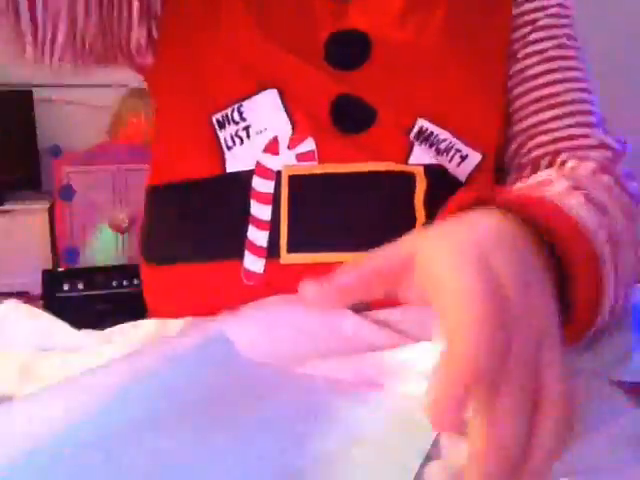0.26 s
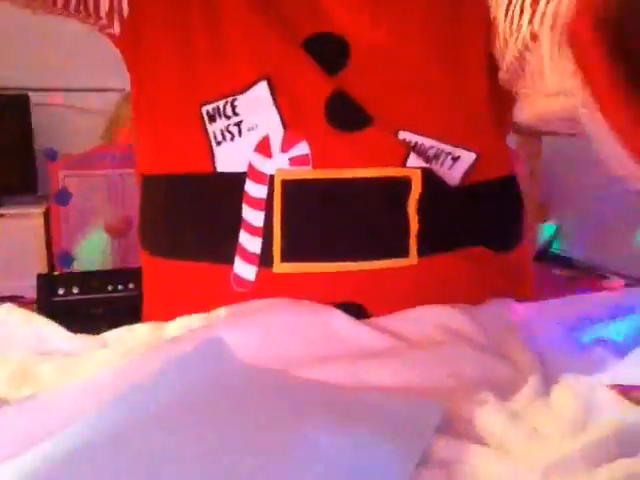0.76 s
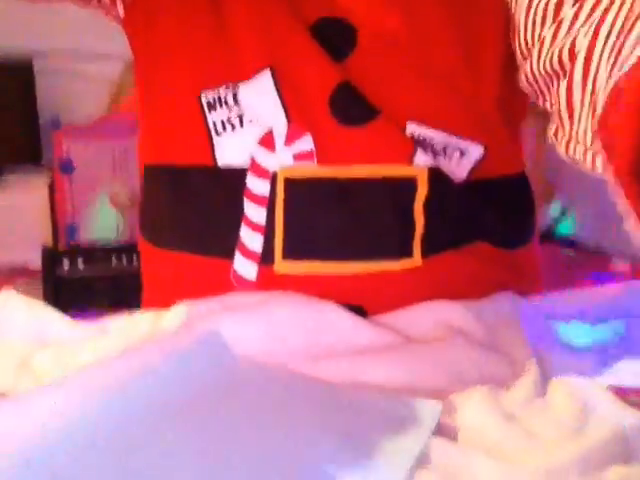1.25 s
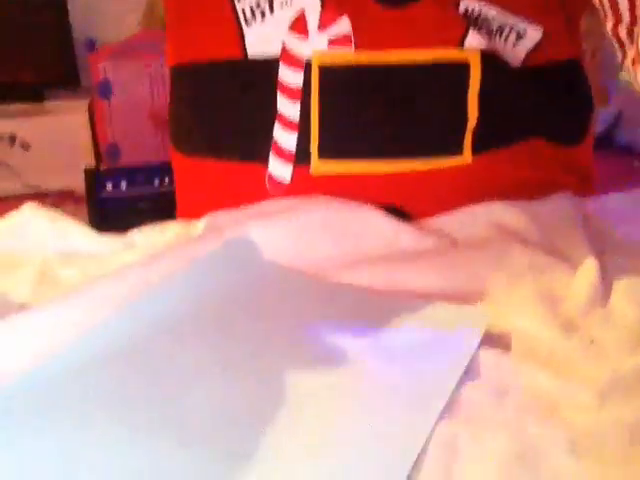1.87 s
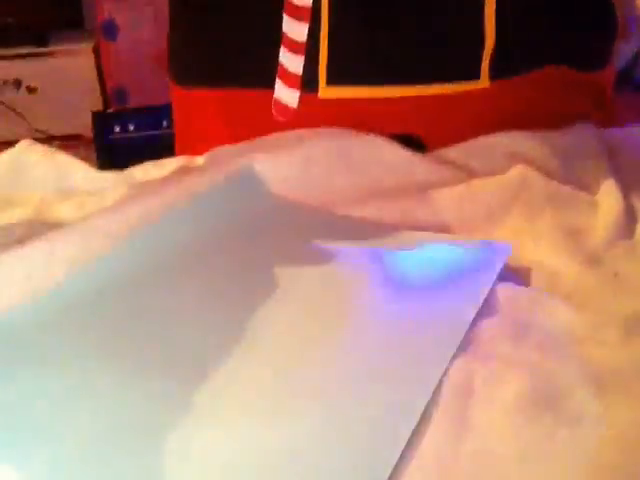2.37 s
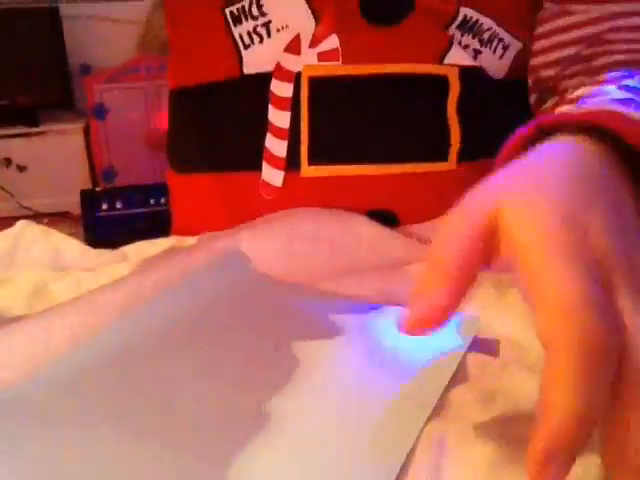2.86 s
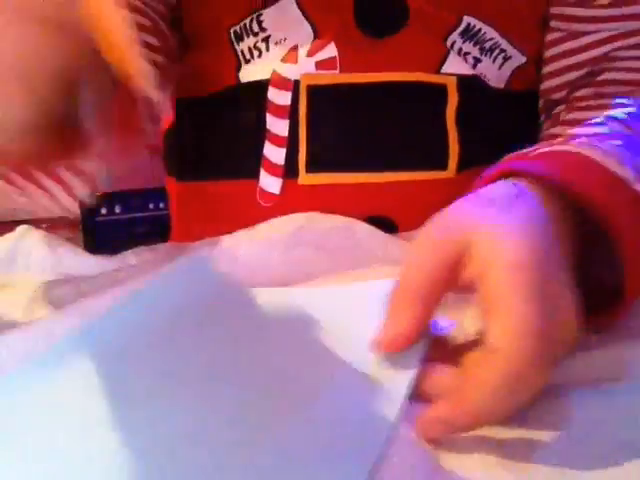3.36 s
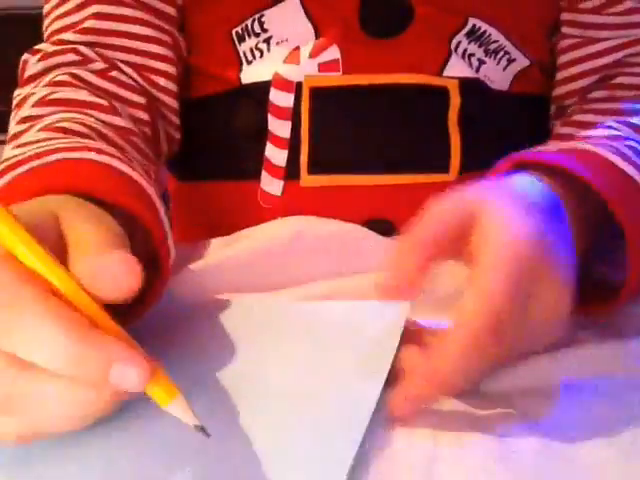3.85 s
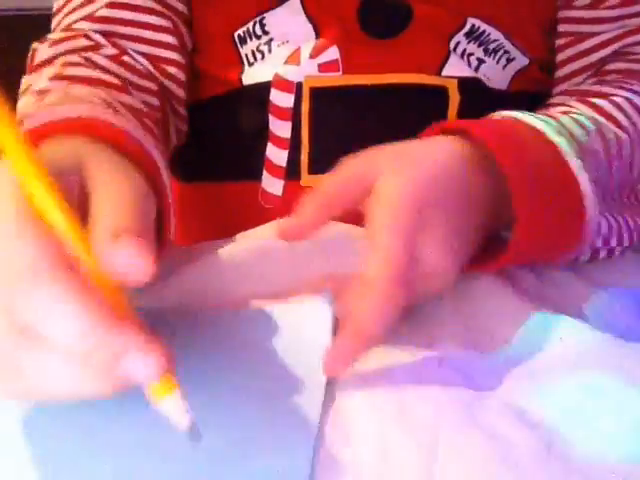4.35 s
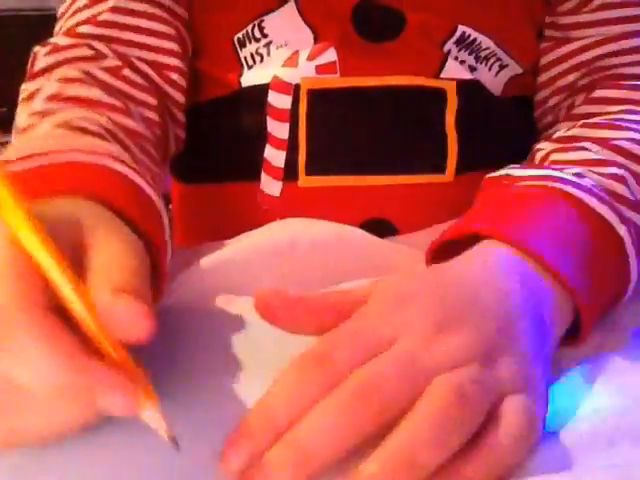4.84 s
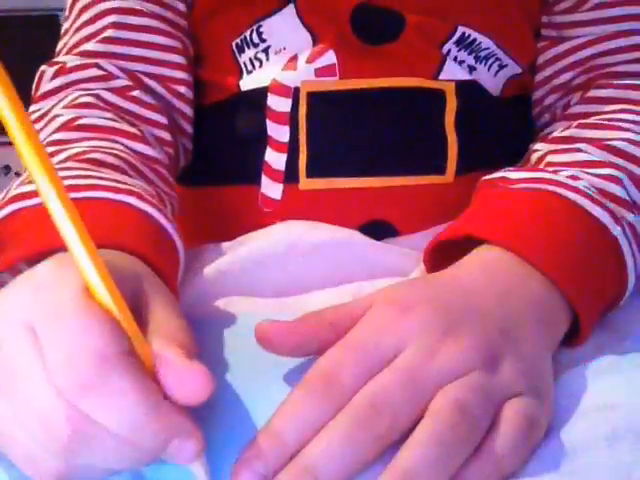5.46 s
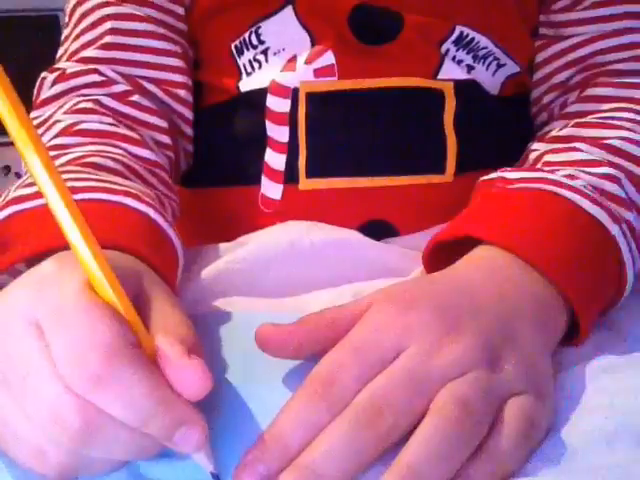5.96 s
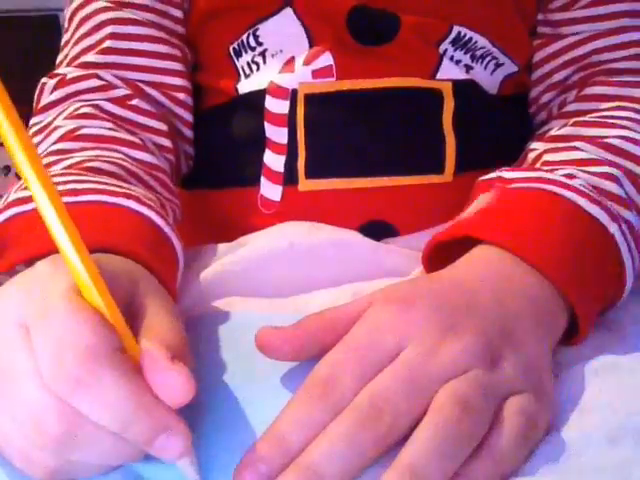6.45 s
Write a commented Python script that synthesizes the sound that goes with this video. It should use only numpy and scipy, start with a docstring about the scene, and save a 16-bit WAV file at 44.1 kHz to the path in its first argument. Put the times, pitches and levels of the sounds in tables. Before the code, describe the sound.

Hands grab a small plastic camera and tilt it, making sharp cracks, dull thuds and rubbing right at the microphone. Its stiff hinge creaks in a run of little slips, and another loud knock follows. Then it gets much quieter: hands slide over paper with a soft hiss, and a pencil scratches in short strokes with tiny clicks. A quiet room and faint microphone hiss lie underneath.

```python
"""A small camera's plastic shell cracks, thuds and creaks as hands tilt it on its stiff hinge.
Tiny sharp bursts make the thin plastic ring, soft pushes and finger taps thud through its body, and
the hinge creaks in a run of little slips. Then the hands slide over paper with a hiss, and a pencil
scratches on it in short strokes. Behind it all are a quiet room and a hissy microphone."""
import sys
import numpy as np
from scipy import signal
from scipy.fft import rfft, irfft
from scipy.io import wavfile
from scipy.ndimage import uniform_filter1d

SR = 44100
rng = np.random.default_rng(int(sys.argv[2]) if len(sys.argv) > 2 else 0)


def wrap_up_sound(samples):
    """Save the sound to the file named by the first command line argument, as 16-bit audio."""
    columns = np.atleast_2d(samples).T
    # keep every value between -1 and 1, then stretch to whole-number steps
    tamed = np.clip(columns, -1, 1)
    steps = np.round(tamed * 32767).astype(np.int16)
    wavfile.write(sys.argv[1], SR, steps)


N = 295470
SIZE, LEAD = 4096, 512  # samples in one crack or thud, and in its run-up
HZ = np.fft.rfftfreq(SIZE, 1 / SR) + 1e-3
HOP, FRAMES = 64, N // 64 + 5  # noise is built in short frames, HOP samples apart

# Notes at which the thin shell rings: f/Hz, level/dB, time to fade by 60 dB/s
SHELL_NOTES = [(1130, -14.5, 0.01), (2140, -8.5, 0.016), (2680, -3, 0.015), (3470, -10, 0.002),
               (4610, -2.5, 0.007), (6770, 1.5, 0.0013), (8710, -1, .005), (15100, -14, 0.0027)]


def gain_of(db):
    """Turn decibels into a factor to multiply by; gain_of(2 * db) gives power."""
    return 10 ** (np.asarray(db) / 20)


def level_at(points, hz):
    """Read a tone curve's level in dB at any frequency, joining its points on a pitch scale."""
    f, db = np.transpose(points)
    return np.interp(np.log(hz + 1), np.log(f), db)


def ring(notes, scatter_db, count):
    """Spectra of fading notes; each hit lands somewhere new and so mixes them differently."""
    hz, db, fade_s = np.transpose(notes)
    weight = gain_of(db + scatter_db * rng.standard_normal((count, len(notes))))
    damping = (np.log(1000) / fade_s / (2 * np.pi))[:, None]
    hz = hz[:, None]
    return weight @ (hz * damping / (hz ** 2 - HZ ** 2 + 2j * HZ * damping))


def place(seconds, peak_db, spectra):
    """Turn each spectrum into a short sound that peaks at the given time and level."""
    shapes = irfft(spectra * np.exp(-2j * np.pi * HZ * LEAD / SR), SIZE)
    shapes *= (gain_of(peak_db) / abs(shapes).max(1))[:, None] * signal.windows.tukey(SIZE, .1)
    out = np.zeros(N + SIZE)
    for s, shape in zip(seconds, shapes):
        out[round(s * SR) - abs(shape).argmax():][:SIZE] += shape
    return out[:N]


def noise(tone, level_db, patchy_db, flicker_db, drift_db=0):
    """Noise shaped by a tone curve; patches of it swell and fade while the whole of it flickers."""
    real, imag, patches = rng.standard_normal((FRAMES, 2 * HOP + 1, 3)).T
    patches = uniform_filter1d(uniform_filter1d(patches, size=5, axis=0), size=18, axis=1)
    flicker = uniform_filter1d(rng.standard_normal(FRAMES), size=4)
    colour = gain_of(level_at(tone, np.fft.rfftfreq(4 * HOP, 1 / SR))[:, None] + drift_db)
    strength = ((colour ** 2).mean(0) / gain_of(2 * drift_db).mean()) ** .5
    wobble_db = drift_db + patchy_db * patches / patches.std() + flicker_db * flicker / flicker.std()
    spectra = (real + 1j * imag) * gain_of(wobble_db) / strength  # keeps the level as the tone drifts
    raw = signal.istft(spectra, nperseg=4 * HOP, noverlap=3 * HOP)[1][:N]
    shaped = irfft(rfft(raw) * gain_of(level_at(tone, np.fft.rfftfreq(N, 1 / SR))), N)
    return shaped / shaped.std() * gain_of(level_db)


def room_hush():
    """The low, steady hush of the room and the microphone's own hiss."""
    # Tone of the background: f/Hz, level/dB
    hush_tone = [(12, -50), (20, -34), (48, -17.5), (123, -5), (216, -0.5), (718, -10.5), (3250, -15),
                 (4420, -17), (14700, -24), (16000, -27.5)]
    return noise(hush_tone, level_db=-66, patchy_db=.6, flicker_db=.3)


def touch():
    """How strongly the hands rub in each frame: swipes swell, hold and fade over a faint contact."""
    # Swipes of skin and cloth: start of hold/s, hold/s, rise by 20 dB/s, fall by 20 dB/s,
    # hiss/dB, hiss centre/octaves above 1 kHz, hiss spread/octaves, rumble/dB
    swipes = [(0.115, 0.062, 0.16, 0.84, -61.5, 2, 1.1, -72), (0.486, 0.024, .05, 0.057, -49, 0, 1, -65),
              (.5, 0.18, .08, .08, -56, 2.5, 1.11, -81), (.58, 0.089, 0.042, 0.068, -45.5, .3, 0.65, -55.5),
              (0.761, .055, 0.018, .04, -30.5, 1.82, 0.56, -26),
              (0.729, .03, 0.012, .02, -40.5, 1, .8, -30), (.88, 0.033, .05, .1, -59, 1, 1, -49.5),
              (1.006, 0.039, 0.022, .03, -48.5, 0.9, .8, -46),
              (1.09, 0.013, 0.021, .05, -50.5, 1.6, 1.22, -51),
              (1.232, 0.041, 0.13, .3, -57, 0.76, 0.64, -53), (1.622, 0.061, .04, .06, -56.5, 1.5, .3, -52),
              (1.702, 0.022, .06, .1, -50, 1.36, .65, -42.5),
              (1.761, 0.022, 0.06, 0.027, -38.5, 2, 0.55, -44.5),
              (1.915, .025, .02, .04, -46.5, 1, .8, -43), (1.949, 0.064, 0.018, .05, -60, 1, .8, -52),
              (2.179, .015, .04, .04, -54, .5, .7, -55), (2.102, 0.25, 0.044, .05, -60, 1.1, 0.45, -55),
              (2.406, 0.045, 0.063, .03, -51.5, 1.8, 0.69, -60),
              (2.451, .012, .04, .025, -45.5, 1.46, 1.2, -43),
              (2.515, 0.0053, 0.043, .045, -45.5, .4, 1, -34), (2.746, 0.013, .04, .12, -62, .5, 1.1, -58),
              (2.78, 0.21, .05, .4, -66, 2.5, 0.59, -60), (2.952, 0.018, 0.14, .12, -56.5, 1.5, 1.7, -70),
              (3.058, .14, .06, .1, -63.5, -0.8, 0.36, -63), (3.342, .12, 0.14, .12, -57, 2, 0.94, -72),
              (3.601, 0.028, .12, 0.11, -58, 1.27, 1.37, -63), (3.734, .11, .15, .07, -57.5, 2, .85, -69.5),
              (4.03, 0.23, 0.083, 0.22, -51.5, 2, .8, -65.5),
              (4.338, 0.031, 0.11, .14, -47, 1.78, 0.95, -56),
              (4.796, .25, 0.37, .15, -64.5, 2, 0.93, -70.5), (4.85, 0.019, .06, .12, -60, 0.66, 0.86, -63),
              (4.86, .03, .03, .08, -55.5, -0.97, .25, -67), (5.298, 0.026, 0.18, .2, -63.5, 1.6, 1.3, -62),
              (5.497, 0.28, .2, 0.13, -65.5, 1.3, 1.33, -66), (6.203, 0.13, 0.18, .3, -68, 1.5, 1.2, -65.5),
              (6.481, 0.24, .15, .3, -61.5, 1.6, 0.95, -65.5)]
    rest_held, rest_free = (-67.5, .8, 0.6, -62.5), (-73, 2.3, 4, -81)  # like the last four columns
    grab_s, let_go_s = .42, 2.62
    t = np.arange(FRAMES) * HOP / SR
    held = (t > grab_s) & (t < let_go_s)
    start, hold, rise, fall = np.transpose(swipes)[:4, :, None]
    swell_db = -20 * np.maximum(np.maximum((start - t) / rise, (t - start - hold) / fall), 0)
    power = np.r_[gain_of(2 * swell_db), [held, ~held]]
    settings = np.r_[np.array(swipes)[:, 4:], [rest_held, rest_free]]
    return t, held, power, settings.T


def rubbing():
    """Skin slides over fine grain: a hiss whose tone follows each swipe, and a rumble in the shell."""
    # Tone of rubbing carried by the plastic while it is held: f/Hz, level/dB
    through_shell = [(800, 0), (1200, 2), (1800, -1), (3100, 0), (4600, -0.5), (6500, -3.5), (10000, 0),
                     (16000, -14.5)]
    # Tone the microphone's opening gives to rubbing heard through the air: f/Hz, level/dB
    through_air = [(800, -3), (1500, -0.5), (2300, -0.5), (2900, -3), (3300, -8.5), (4400, 3.5), (5400, -5),
                   (6500, 2), (7500, -4), (8700, 1), (10500, -4), (14000, -3), (16000, -4.5)]
    # Tone of the shell's lumpy rumble: f/Hz, level/dB
    rumble_tone = [(40, -46.5), (130, -1), (250, 2.5), (480, -0.5), (750, -11.5), (1300, -48)]
    frame_s, held, power, (hiss_db, centre, spread, rumble_db) = touch()
    t, hz = np.arange(N) / SR, np.fft.rfftfreq(4 * HOP, 1 / SR)
    octave = np.log2(hz / 1000 + .05)[:, None]
    offset = (octave - centre) / np.clip(spread, .2, 3)
    band_db = -9 * np.log2(1 + .4 * offset ** 2) - 2.3 * octave - 0.54 * np.maximum(offset, 0) ** 2
    band, hiss_power = gain_of(2 * band_db), gain_of(2 * hiss_db)
    # Where swipes overlap, the louder one has more say in the tone.
    drift_db = 10 * np.log10((band / band.mean(0) * hiss_power) @ power / (hiss_power @ power))
    drift_db += np.where(held, level_at(through_shell, hz)[:, None], level_at(through_air, hz)[:, None])
    hiss_level = np.interp(t, frame_s, 10 * np.log10(hiss_power @ power))
    rumble_level = np.interp(t, frame_s, 10 * np.log10(gain_of(2 * rumble_db) @ power))
    hiss = noise([(300, -14.5), (800, 0)], hiss_level, patchy_db=1.7, flicker_db=0.94, drift_db=drift_db)
    return hiss + noise(rumble_tone, rumble_level, patchy_db=2.5, flicker_db=3.4)


def scattered(count, typical_db, scatter_db=4.5):
    """Random times, levels and brightness (-1 to 1), more often where the grip rubs harder."""
    t, held, power, (hiss_db, *_) = touch()
    share = np.cumsum(held * (gain_of(2 * hiss_db) @ power) ** 0.18)
    when, size, brightness = rng.random((count, 3)).T
    peak_db = typical_db - scatter_db * (1 + np.log(size + .02))
    return np.interp(when, share / share[-1], t), peak_db, 2 * brightness - 1


def cracks(events, notes, burst_s, direct, top_db_per_octave):
    """A burst of tiny breaks, about a millisecond long, makes thin plastic ring."""
    s, peak_db, treble_db = np.transpose(events)
    t = np.arange(SIZE) / SR
    burst = rng.standard_normal((len(s), SIZE)) * np.exp(-t / burst_s)
    burst[:, 0] += 2.2  # a sharp first click
    tilt_db = treble_db[:, None] * np.clip(np.log2(HZ / 3000) / 1.5, -.3, 1.2)
    tilt_db += top_db_per_octave * np.maximum(np.log2(HZ / 9000), 0)
    bass_cut = 1 / (1 - 1j * 1100 / HZ) ** 3
    ringing = ring(notes, scatter_db=5.7, count=len(s))
    return place(s, peak_db, rfft(burst) * gain_of(tilt_db) * bass_cut * (direct + ringing))


def shell_cracks():
    """The handled shell snaps sharply, with faint random crackles in between."""
    # Snaps of the plastic: t/s, peak level/dB, treble against middle/dB
    snaps = [(0.4358, -41, -14), (0.7233, -34, -13.5), (0.7268, -24, -22), (0.7326, -23.5, -19),
             (0.7372, -11, -19.5), (0.7556, -26, -14), (0.7572, -7, -4), (0.8301, -30, -4),
             (0.8835, -34, -16), (0.8885, -34, -11), (0.9104, -23.5, -1.5), (0.9133, -19, -4),
             (0.9464, -29, -12), (0.9711, -38, -22), (0.9994, -16.5, -26), (1.0145, -2.5, 3.5),
             (1.0061, -36.5, -22), (1.0258, -18, -15), (1.0311, -2, -13.5), (1.0331, -8, -11),
             (1.0543, -32, -28), (1.0865, -44, -30), (1.0911, -26, -25), (1.1774, -38, -9),
             (1.1942, -36, -9), (1.2711, -35.5, -20), (1.4997, -30, -6.5), (1.5214, -37, -16),
             (1.5268, -21, -24.5), (1.6732, -24, -56.5), (1.6951, -16.5, -20), (1.7037, -14.5, -13.5),
             (1.7146, -20.5, -11), (1.7254, -20, -16), (1.7431, -25.5, -17), (1.76, -19, -27),
             (1.7736, -20.5, -24), (1.8521, -20.5, -28.5), (1.9228, -29, 3), (1.929, -22.5, -35),
             (1.9611, -39, 3), (2.0122, -34, -23), (2.1116, -31.5, -23.5), (2.1594, -39, -4),
             (2.1846, -27.5, -12), (2.1894, -31, -15), (2.319, -29, -29), (2.4624, -8.5, -12),
             (2.4968, -29, -29), (2.5155, -13, -18), (2.5193, -5, -15.5), (2.532, -42, -18),
             (2.5508, -38, -1), (2.6563, -37, -13), (2.6652, -44, -17), (2.8196, -42, -19),
             (2.848, -35.5, -25), (2.957, -35, -32), (3.0199, -52, -10), (3.1785, -41.5, 1.5)]
    s, db, brightness = scattered(count=24, typical_db=-45.5)
    crackles = np.c_[s, db, -12.5 + 7 * brightness]
    return cracks(np.r_[snaps, crackles], SHELL_NOTES, burst_s=0.00035, direct=0.35, top_db_per_octave=-20)


def blows(events, travel_s, hollow, softness, ring_db, scatter_db):
    """A soft push travels through the shell as a bending wave, treble first, and rings the body."""
    # Notes at which the camera's body rings: f/Hz, level/dB, time to fade by 60 dB/s
    body_notes = [(135, -21, .05), (252, -11, .06), (354, 1, 0.017), (488, -7, 0.012), (754, 8.5, 0.01)]
    s, peak_db, hz = np.transpose(events)
    ratio = HZ / hz[:, None]
    panel = 1 / (1 - ratio ** 2 + 1j * ratio / hollow)  # the struck panel's own short note
    push = ratio ** 2 * panel / (1 + (softness * ratio) ** 2) ** 2
    # The wave's speed grows with the square root of frequency.
    lag_cycles = travel_s * (2 * np.sqrt(ratio) - ratio) * hz[:, None]
    ringing = gain_of(ring_db) * ring(body_notes, scatter_db, count=len(s))
    return place(s, peak_db, -push * np.exp(-2j * np.pi * lag_cycles) * (1 - 1j * ringing))


def shell_thuds():
    """Dull knocks reach the microphone through the shell, with faint random bumps from the grip."""
    # Knocks on the shell: t/s, peak level/dB, centre f/Hz
    knocks = [(0.4375, -36, 790), (0.4888, -40, 780), (0.4985, -35, 832), (0.5113, -38, 964),
              (0.6186, -27.5, 920), (0.727, -21.5, 490), (0.7406, -3.5, 333), (0.7581, -1.5, 471),
              (0.7615, -3, 310), (0.766, -21, 304), (0.79, -6.5, 323), (0.7935, -23, 325),
              (0.7985, -8.5, 348), (0.8312, -24.5, 390), (0.9986, -15, 368), (1.003, -19.5, 328),
              (1.0078, -26, 344), (1.0154, -7.5, 403), (1.0265, -17, 468), (1.032, -7, 477.5),
              (1.056, -23, 332.5), (1.0927, -27.5, 289.5), (1.5273, -33.5, 535), (1.6458, -33, 342),
              (1.6762, -34, 549), (1.6979, -32, 355), (1.7039, -28.5, 630), (1.7277, -33, 465),
              (1.7436, -31.5, 610), (1.7875, -32, 580), (1.8524, -28.5, 657), (1.9094, -29, 550),
              (1.9156, -24, 473), (1.9266, -12, 474), (1.9337, -25, 351), (1.9417, -28, 430),
              (2.0151, -42, 690), (2.3933, -38, 350), (2.4634, -14, 477), (2.5, -36, 700),
              (2.5164, -6, 455), (2.5205, -9, 470), (2.525, -15, 286), (2.5385, -34, 240),
              (2.6018, -35.5, 426), (2.6566, -43.5, 750), (2.9454, -47, 421), (2.9577, -38, 587),
              (3.6111, -43.5, 616), (4.1165, -35.5, 1157), (4.8525, -45.5, 373), (4.858, -50, 308),
              (4.8665, -48, 423), (5.2333, -45, 526), (5.3081, -47.5, 267), (5.537, -46, 395)]
    s, db, brightness = scattered(count=16, typical_db=-43)
    thuds = np.r_[knocks, np.c_[s, db, 430 * 1.5 ** brightness]]
    return blows(thuds, travel_s=.0012, hollow=1.2, softness=0.7, ring_db=0.47, scatter_db=5)


def taps_and_hinge():
    """Fingers tap dully and the stiff hinge slips; as it creaks, a thin tick comes before each slip."""
    # Hinge slips and dull finger taps, farther away along the shell: t/s, peak level/dB, centre f/Hz
    slips_and_taps = [(0.9096, -27.5, 250), (1.1836, -31.5, 211), (1.2753, -26.5, 313), (2.0715, -34, 445),
                      (2.076, -50, 304), (2.0945, -35.5, 468.5), (2.101, -40, 523), (2.1128, -31, 470),
                      (2.1306, -34, 470), (2.1504, -29.5, 456), (2.1756, -30.5, 443), (2.189, -50, 498),
                      (2.1985, -28, 390), (2.2189, -28.5, 406), (2.2431, -28, 440), (2.2633, -31.5, 417),
                      (2.283, -32.5, 405), (2.3, -34, 428), (2.3147, -31, 375), (2.3232, -30, 700),
                      (2.341, -37, 353), (2.3661, -39.5, 410), (2.6108, -41, 560), (2.7283, -45, 390),
                      (2.7474, -30.5, 435), (2.8525, -35.5, 490), (2.8875, -30.5, 340)]
    # Notes at which the hinge rings: f/Hz, level/dB, time to fade by 60 dB/s
    hinge_notes = [(1880, 3, 0.0105), (2878, 1, 0.0026), (8950, 3, 0.0053)]
    creak_from_s, creak_to_s = 2.085, 2.38
    early_s, quieter_db, treble_db = 0.0024, 6, -12.5  # each tick
    ticks = [(s - early_s, db - quieter_db, treble_db)
             for s, db, _ in slips_and_taps if creak_from_s < s < creak_to_s]
    thin = cracks(ticks, hinge_notes, burst_s=0.00126, direct=0.103, top_db_per_octave=-26)
    dull = blows(slips_and_taps, travel_s=0.00398, hollow=1.7, softness=0.55, ring_db=0.37, scatter_db=4.1)
    return thin + dull


def paper_ticks():
    """The paper and the pencil point give off faint, short clicks."""
    # Clicks: t/s, peak level/dB, treble against middle/dB
    ticks = [(3.5824, -46, -7), (3.6104, -36.5, -17), (3.7222, -38.5, -12), (4.5954, -43, -5),
             (4.8372, -44, -20.5), (4.8639, -32.5, -25), (4.8869, -42, -18), (5.2334, -35.5, -15.5),
             (5.4981, -40, 0.5), (5.5455, -34, 11), (5.5614, -44, -2.5), (5.7352, -38.5, 0.5),
             (6.1636, -46.5, 3.5), (6.2523, -39.5, -1), (6.2675, -37, 5), (6.279, -43.5, 8),
             (6.2997, -35, 0), (6.3142, -50, -2), (6.4232, -33, 4.5), (6.4322, -42.5, 5),
             (6.4499, -36.5, 2.5), (6.5289, -38.5, -10), (6.5824, -51, 8.5), (6.6491, -32.5, 5)]
    return cracks(ticks, SHELL_NOTES, burst_s=0.00041, direct=0.43, top_db_per_octave=2.8)


def pencil():
    """Pencil lead grinds over rough paper in short swelling strokes, catching on fibres as it goes."""
    # Pencil strokes: middle t/s, length/s, level/dB
    strokes = [(4.856, 0.02, -67), (4.952, 0.091, -60.5), (5.454, 0.02, -57.5), (5.492, 0.05, -55.5),
               (5.56, 0.03, -55), (5.598, 0.035, -53), (5.629, 0.051, -56.5), (5.666, 0.031, -55.5),
               (5.699, 0.032, -57), (5.734, 0.012, -54), (5.803, 0.072, -62.5), (6.172, 0.074, -60.5),
               (6.268, 0.028, -50), (6.317, 0.008, -57), (6.355, 0.053, -57), (6.428, 0.019, -57),
               (6.508, 0.03, -54), (6.539, 0.035, -54.5), (6.58, 0.036, -57.5)]
    # Tone of the grinding lead: f/Hz, level/dB
    lead_tone = [(300, -8.5), (1000, -2), (2000, 2), (3300, -6.5), (4500, -3.5), (7000, -12), (9500, -17),
                 (13500, -13)]
    catches_per_s = 1400
    t = np.arange(N) / SR
    pressure = sum(gain_of(db) * np.cos(np.pi * np.clip((t - s) / (0.99 * length), -.5, .5))
                   for s, length, db in strokes)
    catches = rng.exponential(1, N) ** 3 * (rng.random(N) < catches_per_s / SR)
    grit = 1 + 0.19 * uniform_filter1d(catches, size=40)
    return pressure * grit * noise(lead_tone, level_db=0, patchy_db=1.7, flicker_db=0.83)


def scene():
    """Handling sounds right at the microphone, over the room's hush, in one channel."""
    return (room_hush() + rubbing() + shell_cracks() + shell_thuds() + taps_and_hinge()
            + paper_ticks() + pencil())[None]


def record(dry):
    """The small microphone loses the deep bass, and the very highest treble is cut off."""
    bass_hz, top_hz = 85, 16000
    thinned = signal.sosfilt(signal.butter(2, bass_hz, "high", fs=SR, output="sos"), dry)
    treble_cut = signal.firwin(511, top_hz, window=("kaiser", 12), fs=SR)
    return signal.oaconvolve(thinned, treble_cut[None], "same")


dry = scene()
out = record(dry)
wrap_up_sound(out)
```